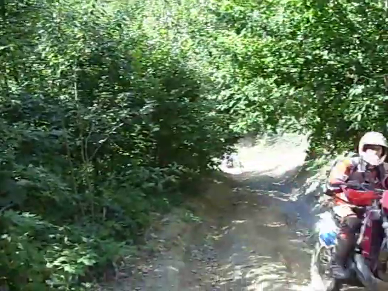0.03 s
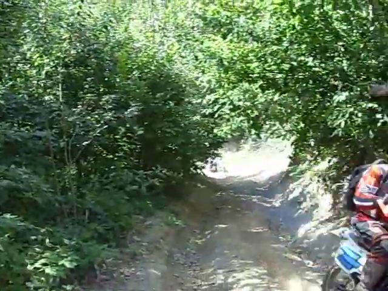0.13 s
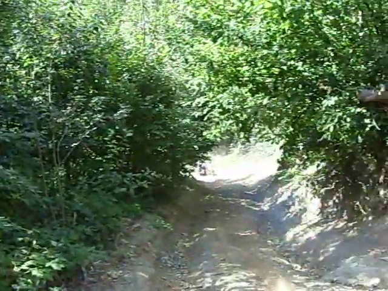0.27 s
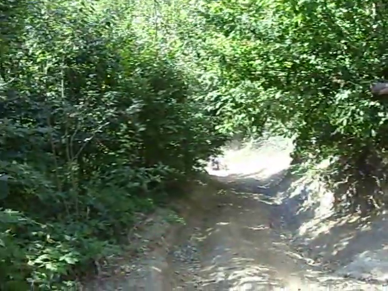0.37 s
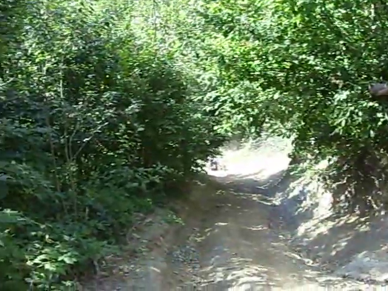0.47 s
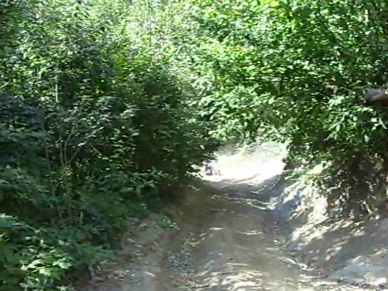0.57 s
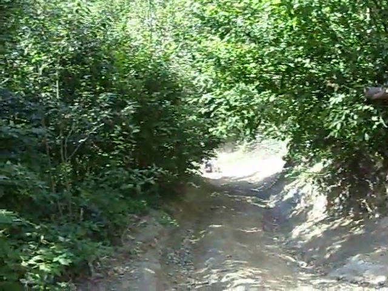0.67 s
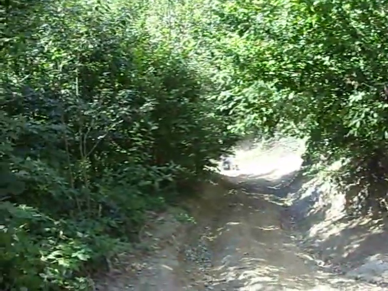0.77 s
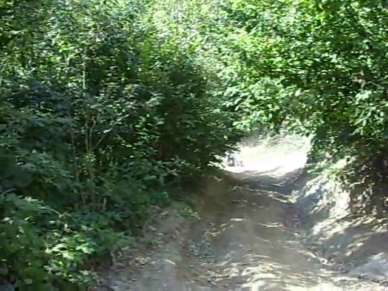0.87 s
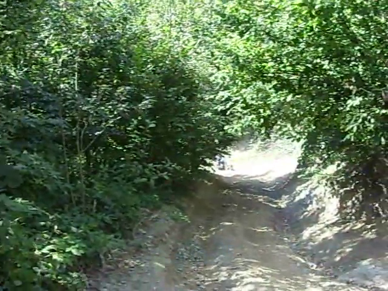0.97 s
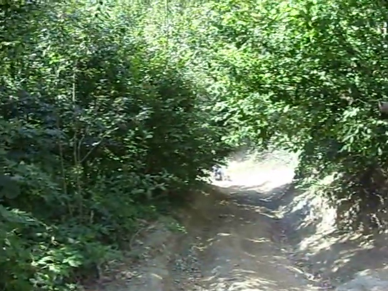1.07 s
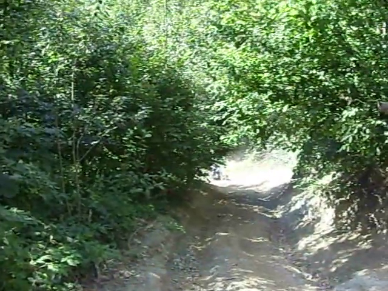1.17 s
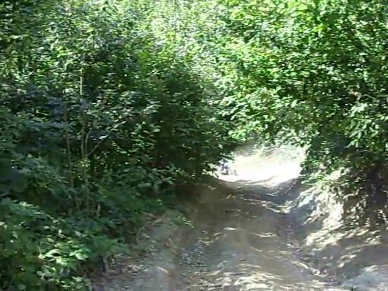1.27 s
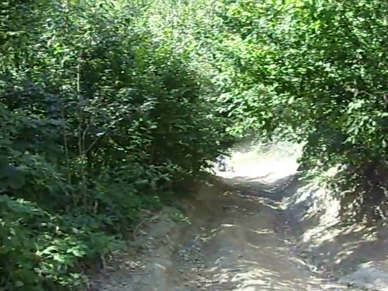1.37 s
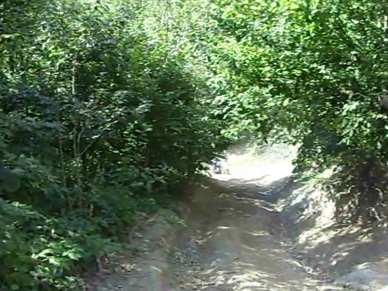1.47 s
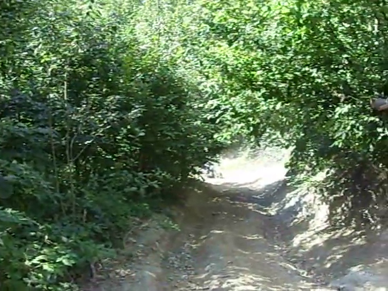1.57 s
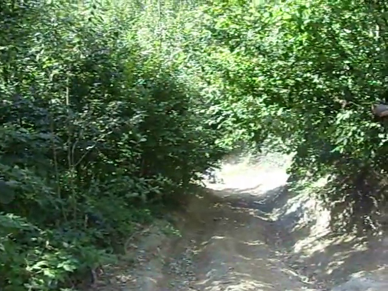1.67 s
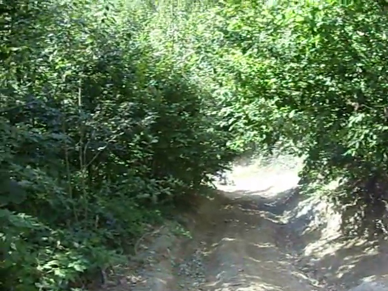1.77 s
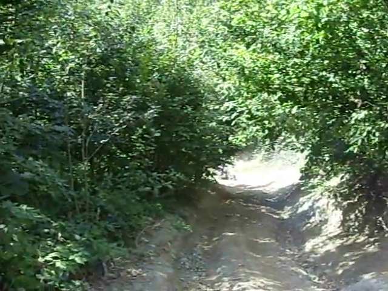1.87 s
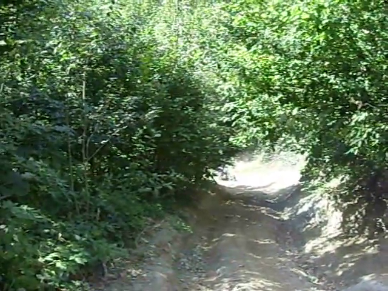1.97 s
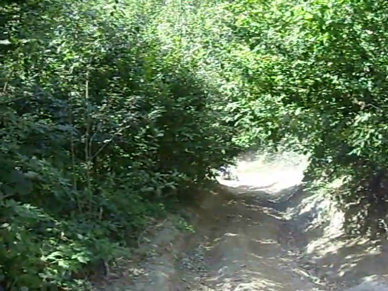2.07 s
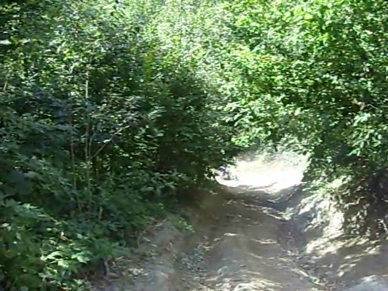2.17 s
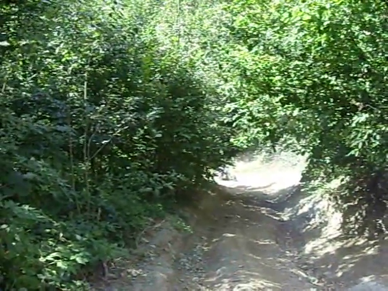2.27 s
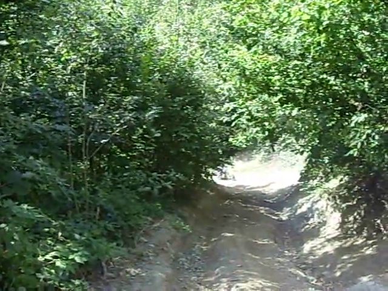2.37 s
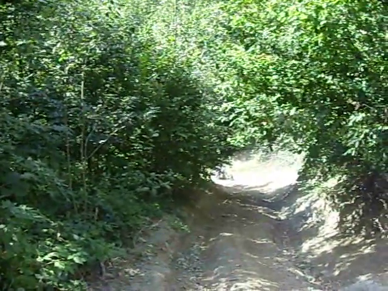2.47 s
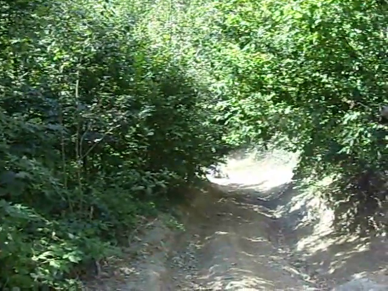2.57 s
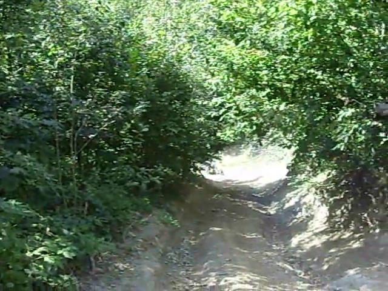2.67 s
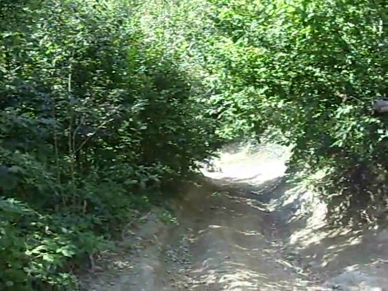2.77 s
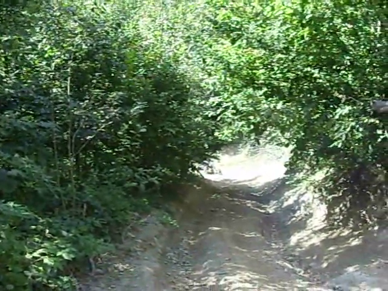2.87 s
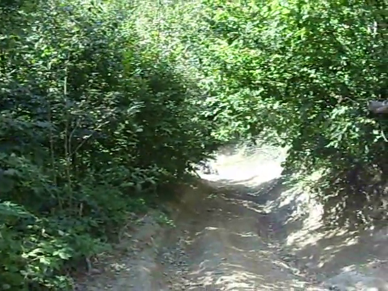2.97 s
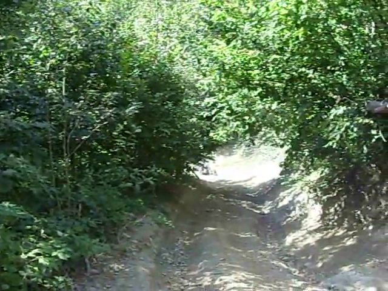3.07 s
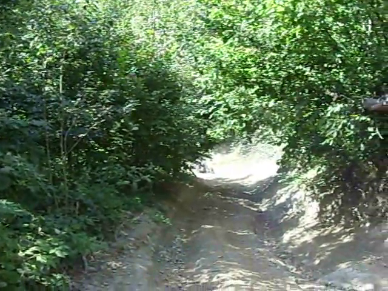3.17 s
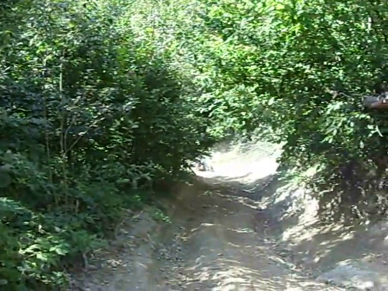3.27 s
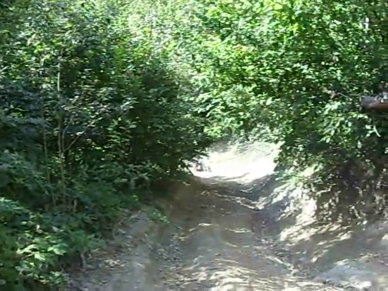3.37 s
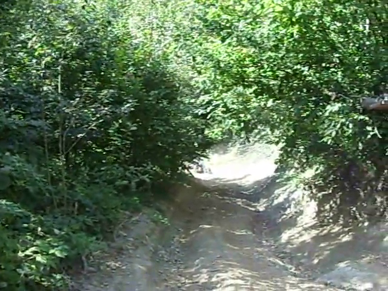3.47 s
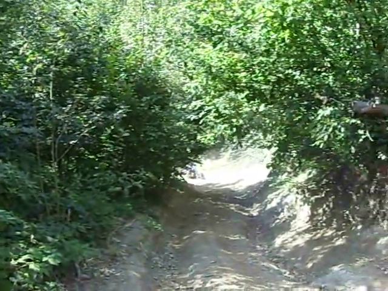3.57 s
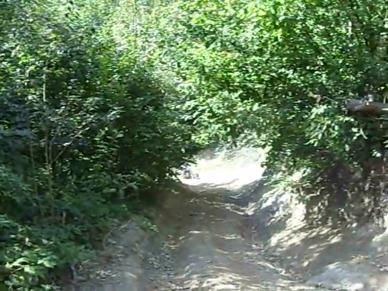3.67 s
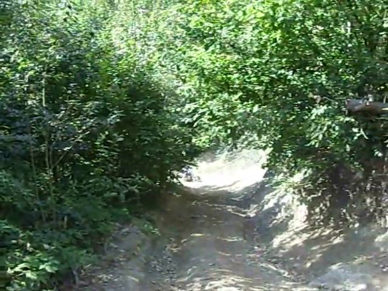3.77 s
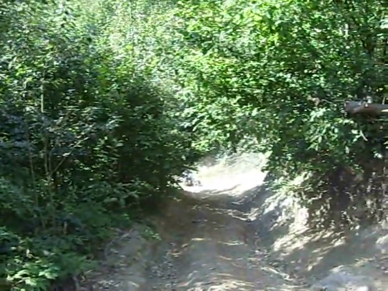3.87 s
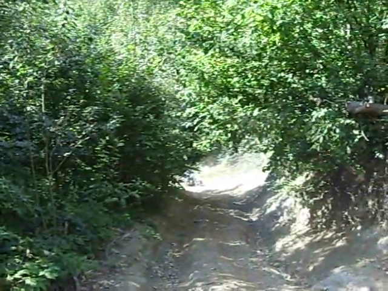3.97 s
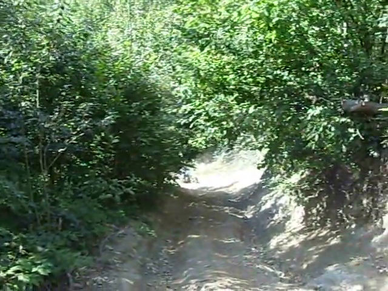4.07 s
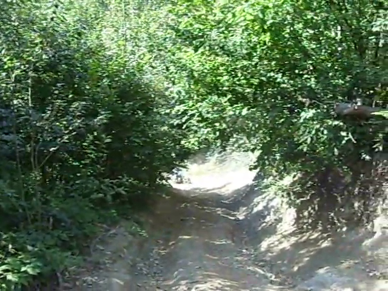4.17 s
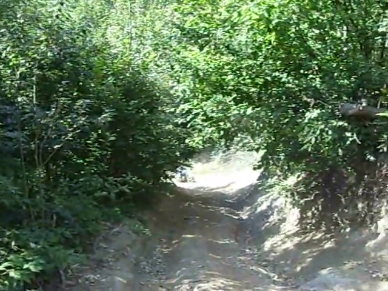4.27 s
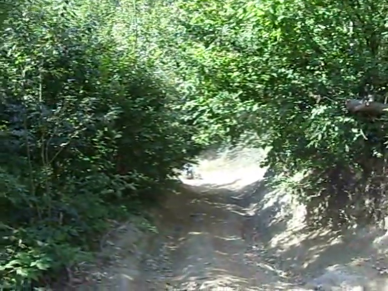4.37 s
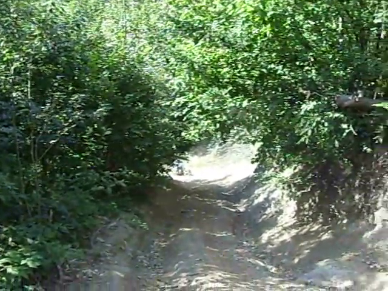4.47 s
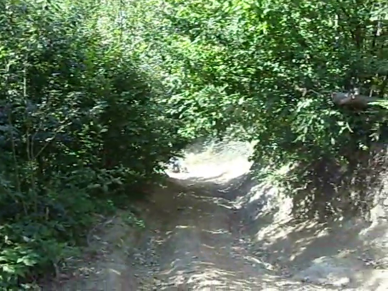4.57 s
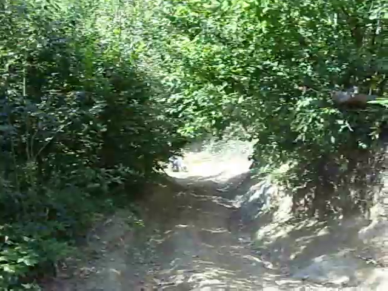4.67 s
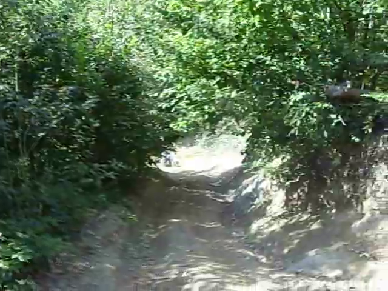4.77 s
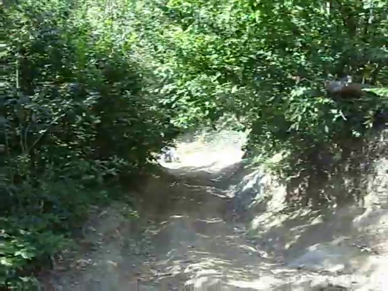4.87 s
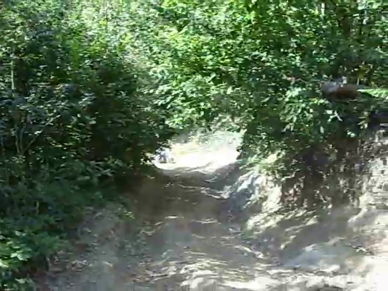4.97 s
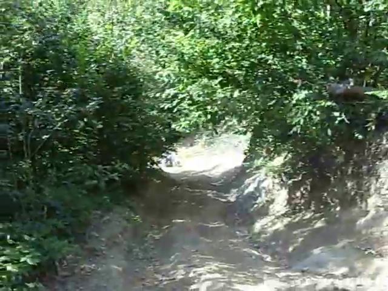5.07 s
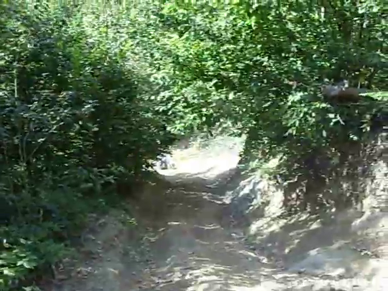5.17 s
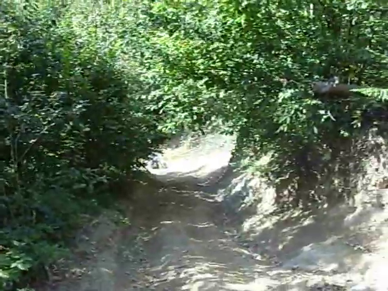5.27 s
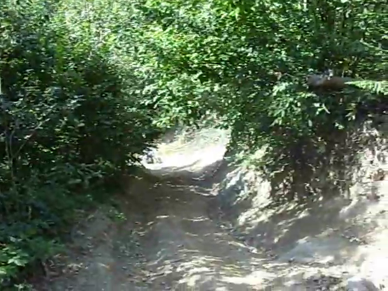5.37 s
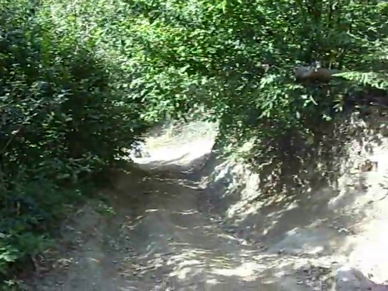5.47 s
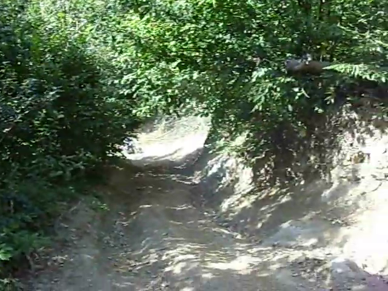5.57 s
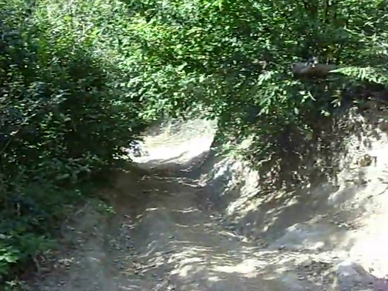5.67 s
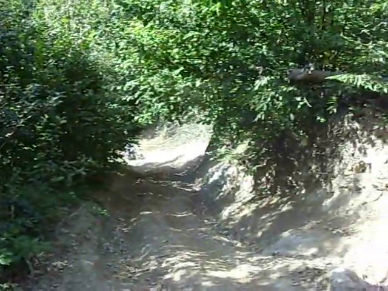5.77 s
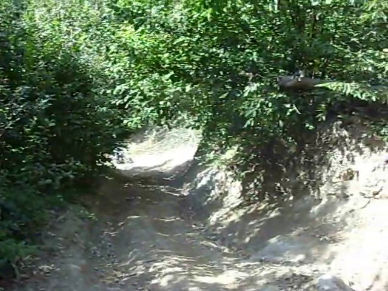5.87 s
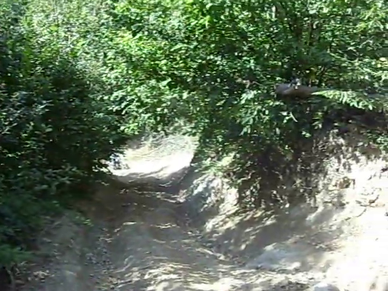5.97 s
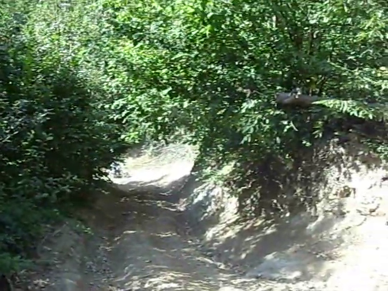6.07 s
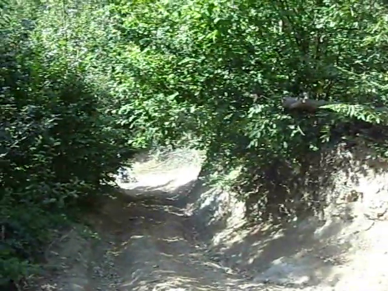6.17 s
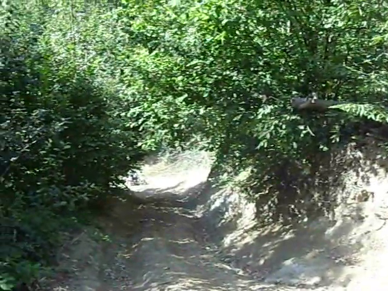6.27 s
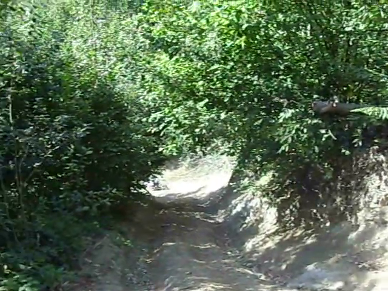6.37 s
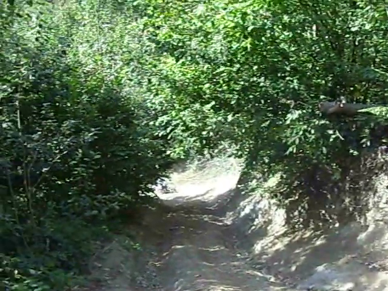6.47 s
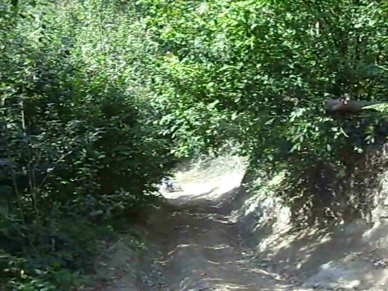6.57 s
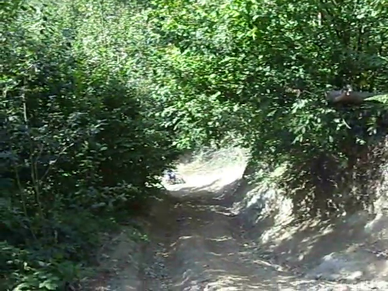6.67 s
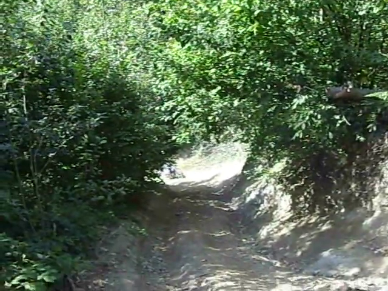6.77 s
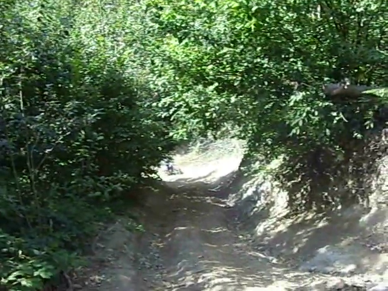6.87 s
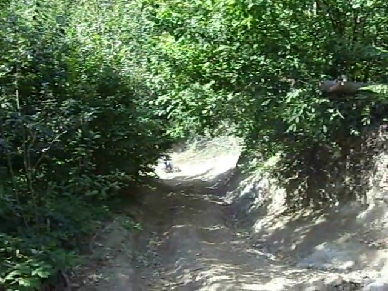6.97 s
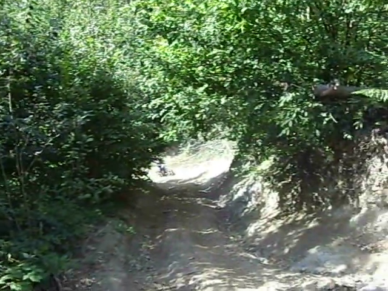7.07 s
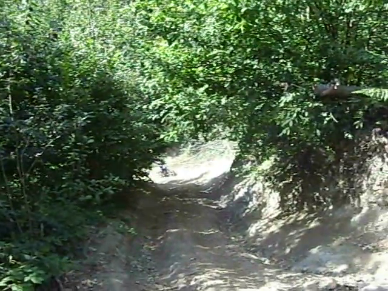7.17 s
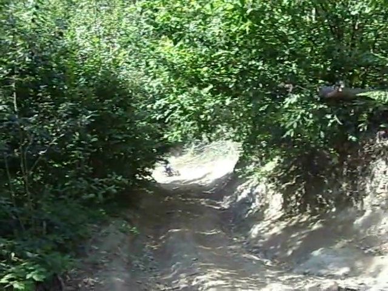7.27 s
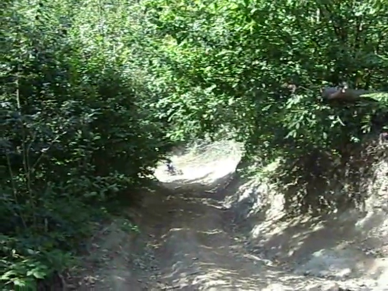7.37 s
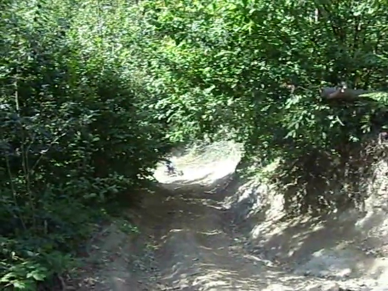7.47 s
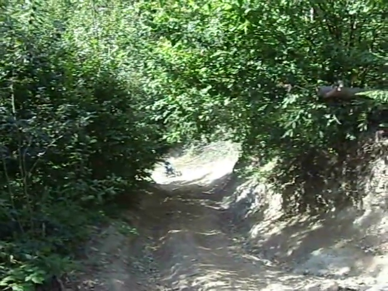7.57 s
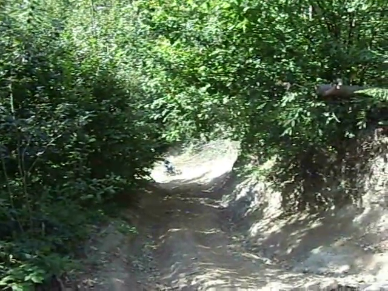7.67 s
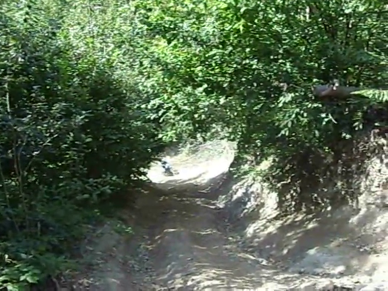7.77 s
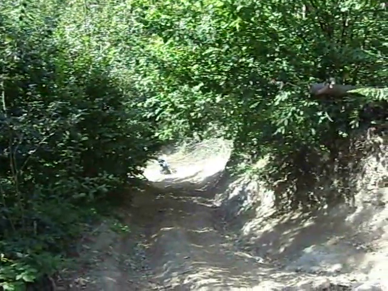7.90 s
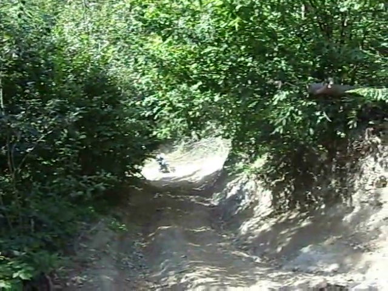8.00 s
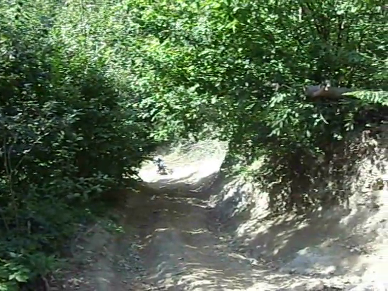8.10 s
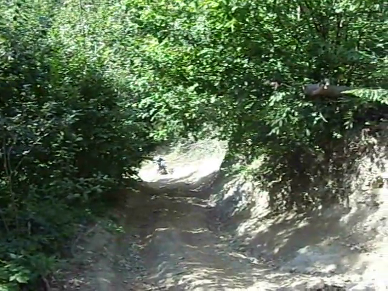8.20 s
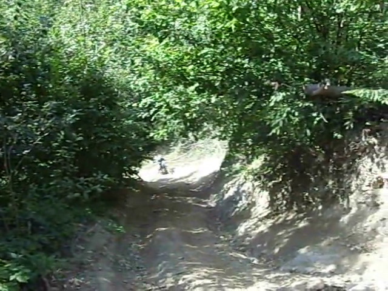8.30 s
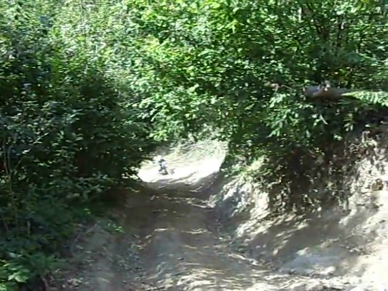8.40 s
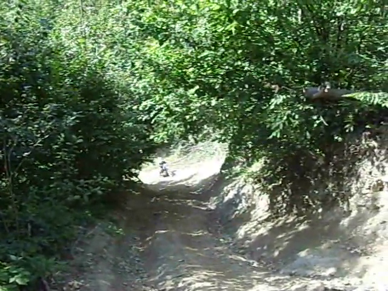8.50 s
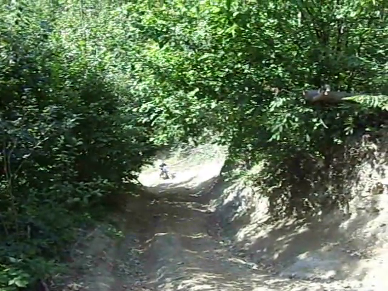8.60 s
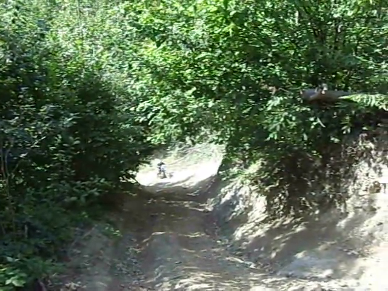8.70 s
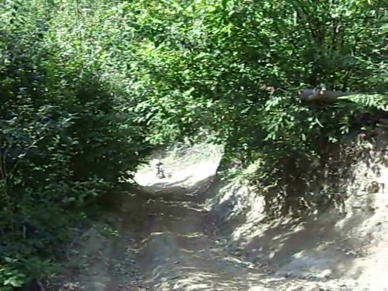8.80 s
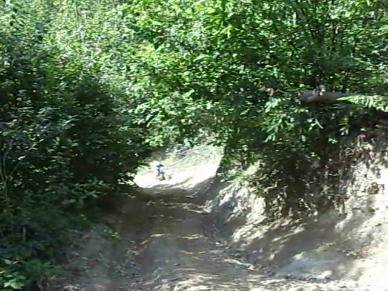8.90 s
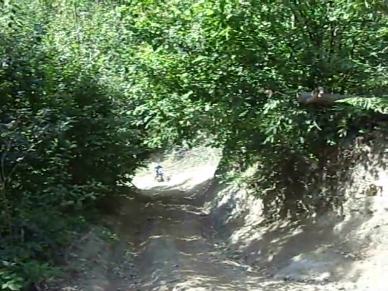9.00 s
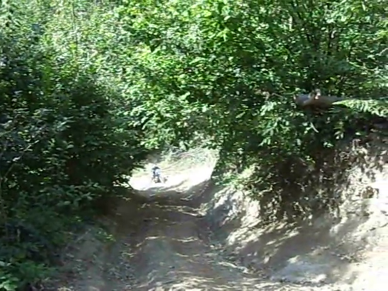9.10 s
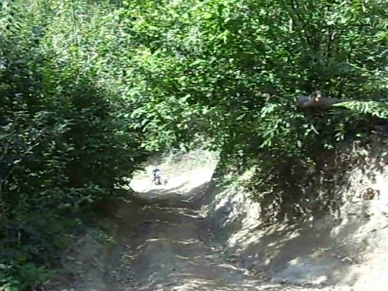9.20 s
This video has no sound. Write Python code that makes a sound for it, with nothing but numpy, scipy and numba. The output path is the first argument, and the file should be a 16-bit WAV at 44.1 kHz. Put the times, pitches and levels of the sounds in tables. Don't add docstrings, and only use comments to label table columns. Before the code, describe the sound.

A two-stroke dirt bike rips past very close, shuts off, sputters and drones away while a slower four-stroke thumps nearer in the woods.

```python
import sys
import numpy as np
from scipy import signal
from scipy.fft import rfft, irfft
from scipy.io import wavfile
from scipy.ndimage import uniform_filter1d
from numba import njit

SR = 44100
rng = np.random.default_rng(int(sys.argv[2]) if len(sys.argv) > 2 else 0)


def generate_wav(sig):
    pcm = np.round(np.clip(np.atleast_2d(sig).T, -1, 1) * 32767).astype(np.int16)
    wavfile.write(sys.argv[1], SR, pcm)


def invert_db(level):
    return 10 ** (np.asarray(level, dtype=float) / 20)


N = 407484
T = np.arange(N) / SR


def level(x, db=0):
    return x * invert_db(db) / np.sqrt(np.mean(x ** 2))


@njit
def svf(x, hz, width):
    y, b, l = np.empty(len(x)), 0., 0.
    for i in range(len(x)):
        g, k = np.tan(np.pi * hz[i] / SR), width / hz[i]
        v = (b + g * (x[i] + 1e-18 - l)) / (1 + g * (g + k))
        b, l, y[i] = 2 * v - b, l + 2 * g * v, k * v
    return y


def ring(x, hz, width_hz):
    return svf(x, hz + 0 * T, float(width_hz))


def ring_twice(x, first_hz, first_width_hz, second_hz, second_width_hz):
    return ring(ring(x, first_hz, first_width_hz), second_hz, second_width_hz)


def body(x, modes):
    return sum((-1) ** k * invert_db(db) * ring(x, hz, width) for k, (hz, width, db) in enumerate(modes))


def clicks(times, sizes):
    out, at = np.zeros(N + 2), np.clip(np.asarray(times) * SR, 0, N)
    np.add.at(out, at.astype(int), sizes * (1 - at % 1))
    np.add.at(out, at.astype(int) + 1, sizes * (at % 1))
    return out[:N]


def blast(pulses, puff_s, gas):
    puff = signal.lfilter([1], [1, -np.exp(-1 / (puff_s * SR))], pulses) / np.sqrt(puff_s * SR / 2)
    return pulses + gas * puff * rng.standard_normal(N)


def silencer_modes(climb, astern):
    # (pitch [Hz], width [Hz], level [dB])
    modes = [(1850, 420, -1), (2884, 930, 0), (3475, 390, 2.5), (5060, 740, -5.5)]
    return [(hz * climb ** (k < 3), width, db - 2.5 * astern * (k % 2) * (k + 1))
            for k, (hz, width, db) in enumerate(modes)]


def two_stroke(spells, pattern, chamber_width):
    # (from [s], to [s])
    shut_spans = [
        (0.441, .58),
        (1.901, 2.8),
    ]
    s, *columns = np.concatenate(spells).T
    hz, open_db = (np.interp(T, s, column) for column in columns)
    shut = uniform_filter1d(sum(1. * (T > a) * (T < b) for a, b in shut_spans), SR // 50)
    crack_db = open_db - 18 * shut

    abreast_s, passing_s = 0.48, 0.52
    bearing = 90 + np.degrees(np.arctan((T - abreast_s) / passing_s))
    deg, *tones = np.transpose(pattern)
    boom_db, header_db, chamber_db = (crack_db + np.interp(bearing, deg, tone) for tone in tones[:3])
    chamber_db += 4.5 * shut
    chamber_hz = np.interp(bearing, deg, tones[3]) * (1 - 0.11 * shut)

    turns = np.cumsum(hz) / SR
    times = np.interp(np.arange(1, turns[-1]), turns, T)
    late, strong = rng.standard_normal((2, len(times)))
    size = 1 / np.sqrt(np.interp(times, T, hz))
    soft = blast(clicks(times + .00004 * late, size * invert_db(.7 * strong)), puff_s=.006, gas=.12)
    hard = blast(clicks(times + .0001 * late, size * invert_db(1.5 * strong)), puff_s=.003, gas=.9)
    hard = (1 - 0.65 * shut) * level(hard) + (0.3 + 0.85 * shut) * rng.standard_normal(N)

    boom = ring_twice(soft, 161, 90, 175.5, 160)
    header = ring_twice(soft, 299, 110, 343, 180)
    chamber = ring_twice(soft, chamber_hz, chamber_width, chamber_hz, 760)
    fundamental = invert_db(0.6 * crack_db - 29.5) * level(ring_twice(soft, 75, 40, 78, 41))
    blow = -invert_db(-8.0) * level(ring_twice(soft, 1015, 230, 967, 350))
    close = np.clip(np.minimum(T - .35, .95 - T) / .15, 0, 1)
    blow += invert_db(-1) * close * level(ring(hard, 1480, 710))

    ahead = np.clip((95 - bearing) / 25, 0, 1)
    astern = np.clip((bearing - 125) / 25, 0, 1)
    climb = 1 + .11 * ahead + .006 * astern * np.maximum(hz - 70, 0)
    crack = level(body(hard, silencer_modes(climb, astern * (1 - shut)))) + blow

    running = sum(1. * (T >= spell[0][0]) * (T < spell[-1][0]) for spell in spells)
    pipe = invert_db(boom_db) * level(boom) - invert_db(header_db) * level(header) + invert_db(chamber_db) * level(chamber)
    pipe += fundamental * (1 - 0.46 * shut) * (hz > 45)
    return uniform_filter1d(running, SR // 20) * (pipe + invert_db(crack_db) * crack)


def ground(x, share):
    # (time [s], lag [ms])
    bounce = [(0, 2.6), (.3, 2.84), (.6, 2.92), (.7, 2.6), (.85, 1.604), (1.25, 1.75), (1.5, 1.16),
              (1.9, 1.31)]
    dirt_hz = 1300
    dull = signal.lfilter(*signal.butter(1, dirt_hz, fs=SR), x)
    lag_s = np.interp(T, *np.transpose(bounce)) / 1000
    filter_delay_s = 1 / (2 * np.pi * dirt_hz)
    return x + share * np.interp(T - lag_s + filter_delay_s, T, dull)


def scatter(x, t60, wet_db, low_hz):
    t = np.arange(SR // 2) / SR
    cloud = rng.standard_normal(len(t)) * invert_db(-60 * t / t60) * (1 - np.exp(-t / 0.0067))
    cloud = signal.lfilter(*signal.butter(1, low_hz, "high", fs=SR), cloud / np.linalg.norm(cloud))
    return x + invert_db(wet_db) * signal.fftconvolve(x, cloud)[:N]


def passing_bike():
    # (time [s], firing rate [Hz], crack level with the throttle open [dB])
    ride = [(0, 85.06, -15.5), (.1, 78.98, -15.5), (.23, 80.68, -13.5), (.33, 85.28, -8.5),
            (.43, 82.5, -15.5), (.48, 70.54, -12.5), (.58, 59, -16.5), (.63, 66.48, -15), (.78, 72.44, -16),
            (.87, 75.6, -14), (.93, 74.1, -13.5), (1.1, 68.7, -18), (1.18, 72.54, -18),
            (1.24, 68.02, -22.5), (1.48, 74.15, -20), (1.74, 80.86, -20), (1.86, 77.53, -21.5),
            (2.0, 59.2, -38)]
    # (bearing from the nose [deg], boom [dB], header [dB], chamber [dB], chamber pitch [Hz])
    radiation = [(55, 3.5, -27, 3, 498), (80, -1.5, -9.5, 5.5, 552), (113.2, 8.5, 3, 7.5, 486),
                 (126.4, -4, 3, 2, 558), (145.3, -7.5, -1.5, 1.5, 625), (154.04, -15.5, 1.5, -11.5, 580),
                 (157.5, -29, -1, -13, 550)]
    bike = two_stroke([ride], radiation, chamber_width=160)
    return scatter(ground(bike, share=.55), t60=.3, wet_db=-6, low_hz=500)


def sputter():
    # (time [s], crack level [dB])
    pops = [(2.8563, -22.5), (2.8999, -10.5), (2.9376, -13.5), (2.9742, -15), (2.9892, -13.5),
            (3.022, -10.5), (3.038, -11.5), (3.0866, -18.5), (3.1046, -23.5), (3.1473, -18.5),
            (3.2131, -14), (3.2602, -14.5), (3.3089, -15), (3.354, -15.5), (3.4023, -21.5), (3.4498, -23),
            (3.4993, -31), (3.547, -26.5)]
    s, crack_db = np.transpose(pops)
    chamber_db = -13 - 0.62 * (crack_db - crack_db.max())
    crack = blast(clicks(s, invert_db(crack_db)), puff_s=.003, gas=.7)
    crack = body(crack, silencer_modes(climb=1, astern=1))
    puffs = blast(clicks(s, invert_db(crack_db + chamber_db)), puff_s=.006, gas=.3)
    chamber = ring_twice(puffs, 345, 130, 260, 230) - 0.29 * ring_twice(puffs, 580, 96, 600, 180)
    return invert_db(18.0) * crack + invert_db(37.0) * chamber


def leaving_bike():
    # (time [s], firing rate [Hz], open-throttle crack level [dB])
    coasting = [(1.94, 63.2, -23), (2.13, 56.84, -28), (2.26, 57, -28.5), (2.42, 53.8, -30.5),
                (2.53, 48.96, -33.5), (2.8, 45.3, -36.5)]
    # (time [s], firing rate [Hz], crack level [dB])
    far_off = [(3.56, 40.08, -51), (4.0, 45, -45.5), (4.11, 41.3, -53.5), (4.3, 47.6, -48),
               (4.442, 49.57, -49.5), (4.722, 46.2, -47), (4.882, 50.8, -49.5), (5.339, 50.54, -53.5),
               (5.898, 56, -64)]
    # (bearing from the nose [deg], boom [dB], header [dB], chamber [dB], chamber pitch [Hz])
    behind = [(170, -9, -5, 0.0026, 396)]
    bike = two_stroke([coasting, far_off], behind, chamber_width=50) + sputter()
    bike = scatter(bike, t60=.25, wet_db=-7, low_hz=400)
    bike = signal.lfilter(*signal.butter(3, 4200, fs=SR), bike)
    return bike - 0.88 * ring(bike, 1280, 750)


def spread(x, rise_s):
    t = np.arange(2048) / SR
    spectrum = rfft(rng.standard_normal(len(t)) * t * np.exp(-t / rise_s))
    power = np.abs(spectrum) ** 2
    burst = irfft(spectrum / np.sqrt(power + .003 * np.mean(power)))
    return signal.fftconvolve(x, burst)[:N]


def four_stroke():
    # (time [s], firing rate [Hz])
    crank = [(1.9, 37.46), (2.88, 28.79), (4.38, 29.85), (4.64, 30.97), (5.14, 26.32), (5.9, 30.17),
             (6.3, 33.73), (6.84, 24.52), (7.02, 25.87), (7.68, 20.61), (8.12, 21.9), (8.25, 19.55),
             (8.43, 21.2), (8.55, 17.7), (8.65, 20.56), (8.91, 21.64), (9.05, 18.27), (9.25, 18.55)]
    skipped = [252, 254, 256, 262, 264, 266, 270]
    weak = [268]
    # (time [s], nearness [dB], throttle [0-1])
    thumper = [(1.9, 1.5, 0.2), (2.6, -2.5, 0.07), (3.2, -2, 0.32), (4, -2, 0.09), (4.7, -1, 0.06),
               (5.2, -2, 1), (5.9, 0, 0.94), (6.25, 3, 1), (6.5, -1, 1.1), (6.8, -1.5, 0.9),
               (7.2, 2.5, 0.7), (7.8, 1, 0.3), (8.6, 4.5, 0.56), (8.9, 5, 0.65), (9.24, 3.5, 0.73)]
    # (pitch [Hz], width [Hz], level [dB])
    muffler = [(2014, 157, 2), (2680, 170, -7.5), (3100, 246, -5.5), (4300, 600, -12.5), (5080, 230, -14.5)]
    # (level [dB], share of nearness [ratio], gain at full throttle [dB])
    layers = [
        (-42.5, 0.68, -5),
        (-55, 0.74, 8.5),
        (-50.5, 0.71, 3),
        (-56.5, 2.33, -0.5),
    ]
    # (pitch at 28 Hz firing [Hz], rise per Hz of firing [Hz])
    tuning = [
        (113, 1.6),
        (300, 5),
        (650, 7),
    ]
    # (time [s], span [s], pipe pitch [ratio], bark pitch [ratio], bark gain [dB])
    crests = [
        (6.62, .2, 1.07, .87, -1),
        (7.7, .3, .74, .92, 3),
    ]

    rate = np.interp(T, *np.transpose(crank))
    count = -1.165 + np.cumsum(rate) / SR
    beats = np.arange(1, int(count[-1]))
    late, strong = rng.standard_normal((2, len(beats)))
    times = np.interp(beats, count, T) + .002 + .0001 * late
    fired_db = -22 * np.isin(beats, skipped) - 9 * np.isin(beats, weak) + 0.5 * np.isin(beats - 1, skipped)
    size = np.sqrt(np.gradient(times)) * invert_db(.7 * strong)

    s, *columns = np.transpose(thumper)
    near_db, throttle = (np.interp(T, s, column) for column in columns)
    thump_db, pipe_db, bark_db, crack_db = (db + share * near_db + open_db * throttle
                                            for db, share, open_db in layers)

    pump = blast(clicks(times, size * invert_db(.3 * fired_db)), puff_s=.012, gas=.04)
    fired = clicks(times, size * invert_db(fired_db))
    soft = spread(fired, rise_s=.0015) + blast(.2 * fired, puff_s=.01, gas=.8)
    hard = .6 * spread(fired, rise_s=.0012) + blast(.2 * fired, puff_s=.006, gas=5.)

    thump_hz, pipe_hz, bark_hz = (hz + rise * (rate - 28) for hz, rise in tuning)
    for s, span, pipe_factor, bark_factor, gain_db in crests:
        over = np.clip(.5 + (T - s) / span, 0, 1)
        pipe_hz = pipe_hz * pipe_factor ** over
        bark_hz = bark_hz * bark_factor ** over
        bark_db = bark_db + gain_db * over

    low_hz = .75 * thump_hz
    thump = ring_twice(pump, thump_hz, 20, thump_hz, 45) - .3 * ring_twice(pump, low_hz, 20, low_hz, 45)
    thump += .5 * ring(pump, 0.82 * thump_hz, 26) - .5 * ring(pump, 28, 6.9)
    thump -= 0.15 * ring_twice(pump, 187, 49, 210, 75)
    pipe = ring_twice(soft, pipe_hz, 60, pipe_hz, 130)
    bark = ring_twice(soft, bark_hz, 140, bark_hz, 280) - .2 * ring_twice(soft, 1100, 350, 1100, 600)
    intake = invert_db(crack_db - 8) * throttle * (T < crests[0][0]) * level(ring(hard, 4530, 610))
    return (intake + invert_db(thump_db) * level(thump) + invert_db(pipe_db) * level(pipe) + invert_db(bark_db) * level(bark)
            + invert_db(crack_db) * level(body(hard, muffler)))


def twigs():
    # (time [s], peak level [dB], pitch [Hz], ring time [s])
    snaps = [
        (5.133, -20, 1050, .014),
        (5.262, -15, 4800, .012),
        (6.311, -29, 4500, .01),
    ]
    out = np.zeros(N)
    for s, db, hz, t60 in snaps:
        crackle = blast(clicks([s], 1), puff_s=.001, gas=1.)
        main = level(ring_twice(crackle, hz, 9 / t60, hz, 1500))
        snap = main + .3 * level(ring_twice(crackle, 2700, 900, 2700, 1500))
        out += invert_db(db) * snap / np.abs(snap).max()
    return out


def woods():
    # (frequency [Hz], level per Hz [dB])
    tone = [(20, -15), (100, -5), (250, -11), (1000, -19), (1340, -27), (2000, -21), (5300, -31),
            (6500, -52)]
    hz = np.fft.rfftfreq(N, 1 / SR) + 1
    tone_hz, tone_db = np.transpose(tone)
    shape = invert_db(np.interp(np.log(hz), np.log(tone_hz), tone_db))
    return level(irfft(rfft(rng.standard_normal(N)) * shape, N), -49)


def scene():
    near = invert_db(-4.0) * passing_bike()
    leaving = leaving_bike()
    coming = scatter(four_stroke(), t60=.2, wet_db=-5, low_hz=400)
    return (near + leaving + coming + twigs() + woods())[None]


def roll_off(x):
    return signal.sosfilt(signal.butter(12, 15890, fs=SR, output="sos"), x)


def record(dry):
    squashed = 0.74 * np.tanh(1.489 * dry / 0.66) / 1.361 * invert_db(2.0)
    band_hz = 5850
    narrow = signal.sosfilt(signal.ellip(10, .3, 95, band_hz, fs=SR, output="sos"), squashed)
    clipped = np.clip(narrow, -.7, .7)
    return roll_off(clipped)


dry = scene()
out = record(dry)
generate_wav(out)
```